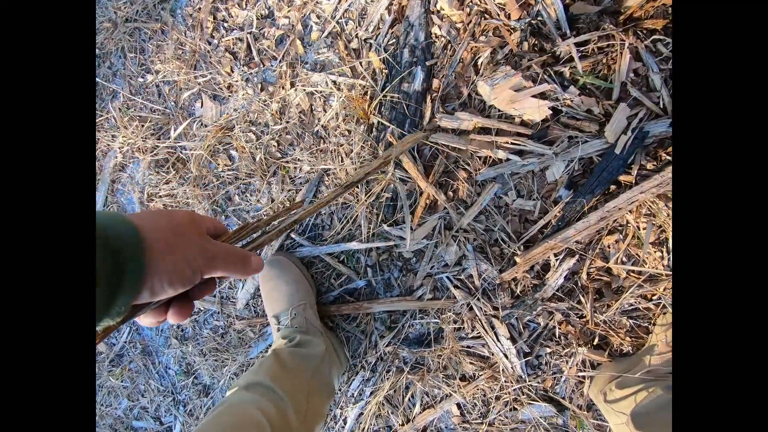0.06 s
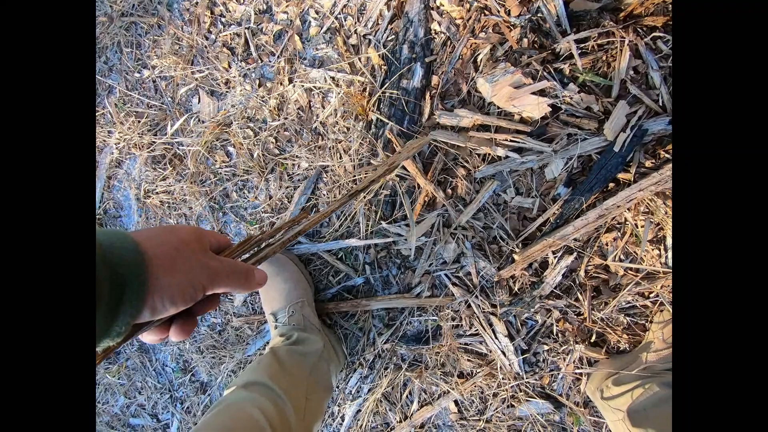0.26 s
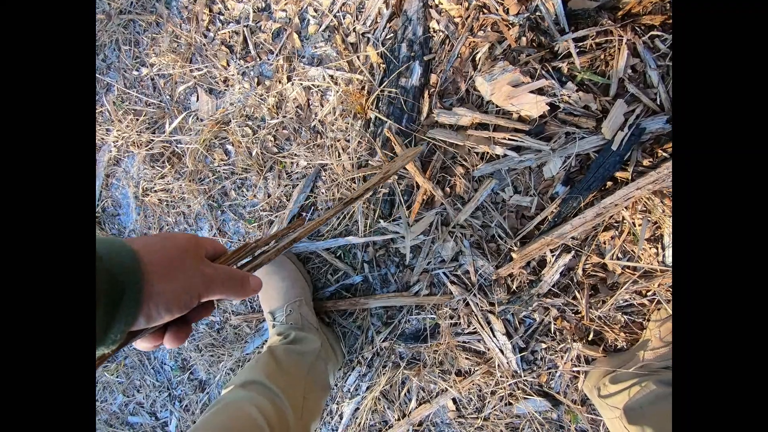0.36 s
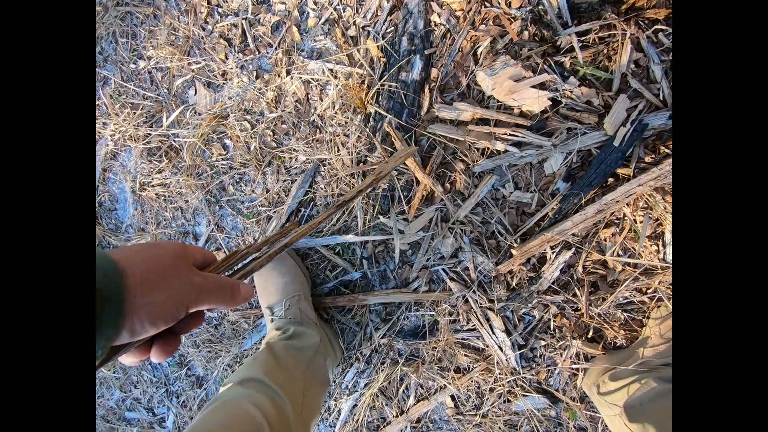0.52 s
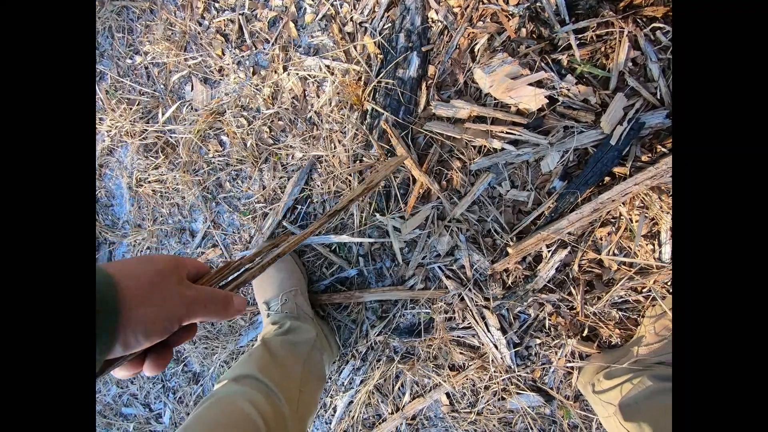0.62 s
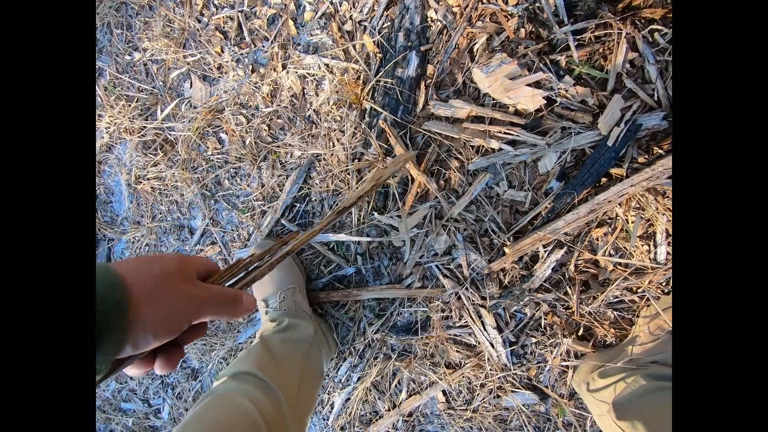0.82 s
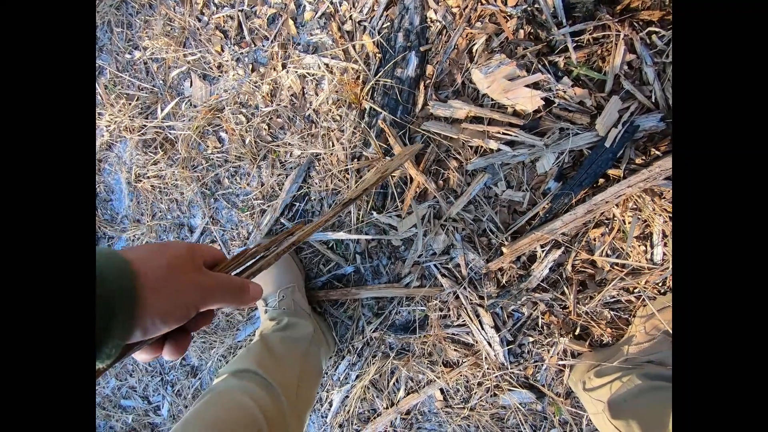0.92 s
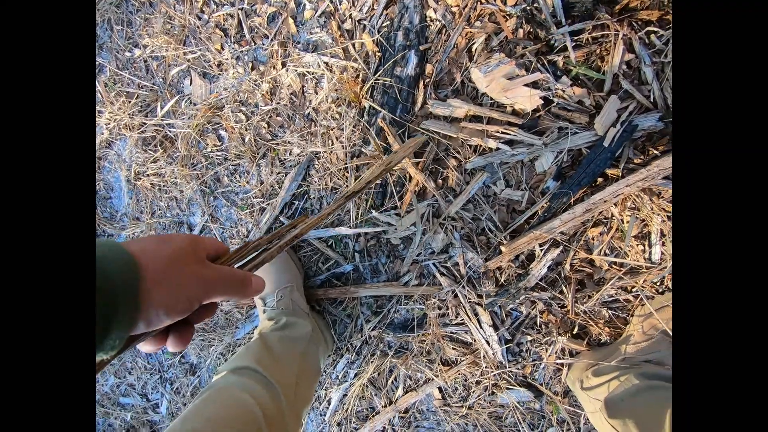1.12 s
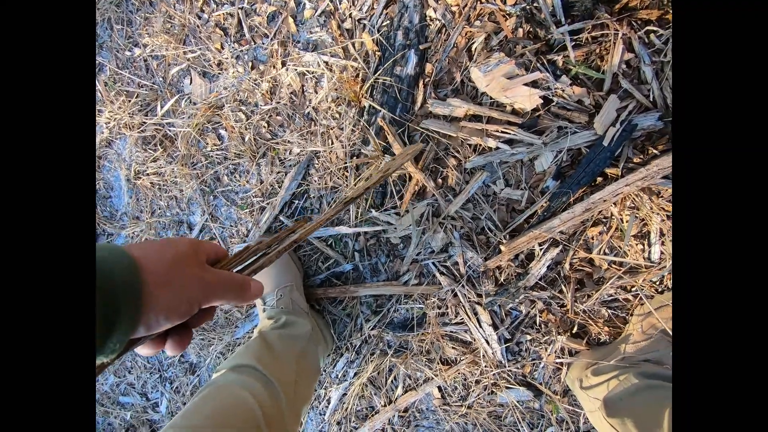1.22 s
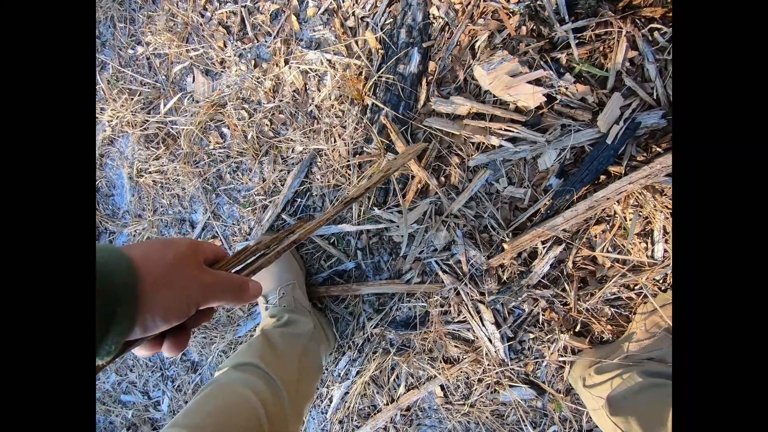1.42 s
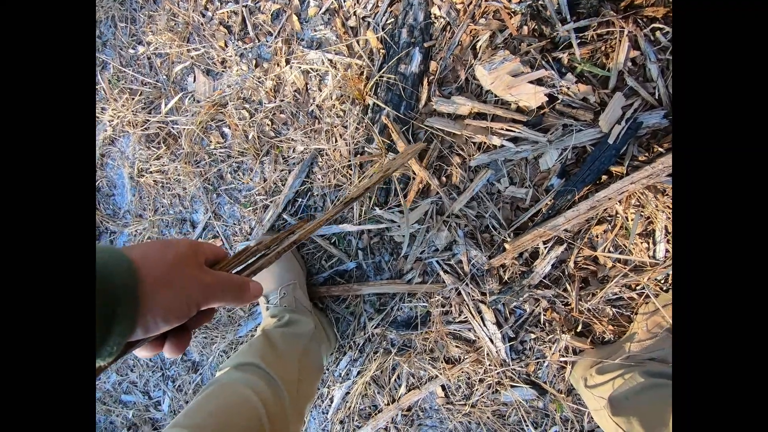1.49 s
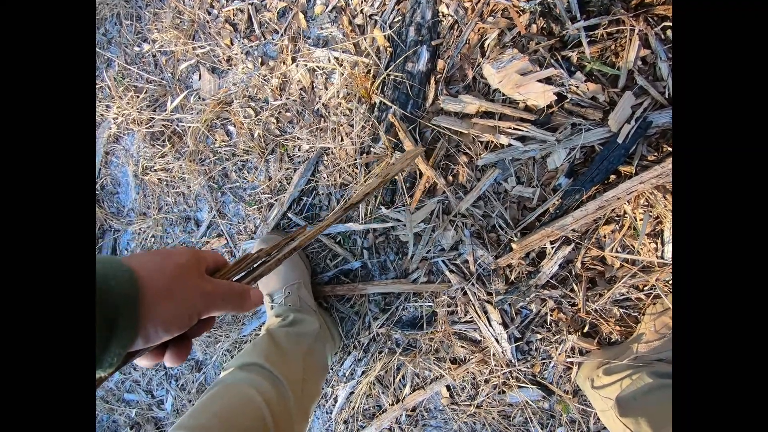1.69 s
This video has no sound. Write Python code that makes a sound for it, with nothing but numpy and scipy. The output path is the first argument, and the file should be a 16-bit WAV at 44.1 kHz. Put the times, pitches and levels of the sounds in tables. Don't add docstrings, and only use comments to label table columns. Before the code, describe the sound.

Dry wood breaking: rapid brittle snaps build to loud cracks, followed by scattered litter crunches and knocks

```python
import sys
import numpy as np
from scipy import signal
from scipy.fft import rfft, irfft
from scipy.io import wavfile

SR = 44100
rng = np.random.default_rng(int(sys.argv[2]) if len(sys.argv) > 2 else 0)


def generate_wav(signal):
    frames = np.transpose(np.atleast_2d(signal))
    scaled = np.clip(frames, -1, 1) * 32767
    pcm = np.round(scaled).astype(np.int16)
    wavfile.write(sys.argv[1], SR, pcm)


def to_linear_factor(level_db):
    exponent = np.asarray(level_db, float) / 20
    return 10 ** exponent


N = 77175

WOOD_LOW_HZ = 2030
PORT_HZ, PORT_WIDTH_HZ, PORT_DB, ROLL_HZ, AIR_DB = 9100, 415, 1, 9630, -12
SIDE_DB = -4.5
FIBRE_PAN_DB, POP_PAN_DB = 0, -1.8


def rms_one(x):
    return x / np.sqrt(np.mean(x ** 2) + 1e-20)


def line(rows, at, warp=np.asarray):
    xs, ys = np.array(rows)[:, 0], np.array(rows)[:, 1]
    return np.interp(warp(at), warp(xs), ys)


def cut(x, hz, kind, order=2):
    return signal.sosfilt(signal.butter(order, hz, kind, fs=SR, output="sos"), x)


def peak(x, hz, width_hz):
    r = np.exp(-np.pi * width_hz / SR)
    feed = np.array([1, 0, -1]) * (1 - r * r) / 2
    return signal.lfilter(feed, [1, -2 * r * np.cos(2 * np.pi * hz / SR), r * r], x)


def drift(rate_hz):
    r = np.exp(-2 * np.pi * rate_hz / SR)
    noise = rng.standard_normal(N + SR // 2)
    return rms_one(signal.lfilter([1], [1, -2 * r, r * r], noise)[SR // 2:])


def grains(shape):
    grains_per_s, spread_db = 5000, 3.0
    size = to_linear_factor(spread_db * np.minimum(rng.exponential(1, shape), 4))
    size = size * rng.choice([-1, 1], shape)
    return rms_one(size * (rng.random(shape) < grains_per_s / SR))


def chips(shape):
    kinds, ring_cycles, ring_db = 14, 5.8, -12.5
    clicks, dealt = grains(shape), rng.integers(0, kinds, shape)
    rung = 0
    for k, hz in enumerate(np.geomspace(1500, 10500, kinds)):
        struck = clicks * (dealt == k) + 1e-18
        rung = rung + rms_one(peak(struck, hz, hz / ring_cycles)) * np.sqrt(hz)
    return rms_one(clicks + to_linear_factor(ring_db) * rms_one(rung))


def ports(x, air_db=AIR_DB):
    x = x + to_linear_factor(PORT_DB) * peak(x, PORT_HZ, PORT_WIDTH_HZ)
    return cut(x, ROLL_HZ, "low", order=6) + to_linear_factor(air_db) * cut(x, ROLL_HZ, "high", order=4)


def add(out, sound, s, pan_db):
    i = int(s * SR)
    pair = sound[0] + to_linear_factor(SIDE_DB) * sound[1] * [[1], [-1]]
    pair = pair * to_linear_factor(np.array([[pan_db / 2], [-pan_db / 2]]))
    out[:, i:i + pair.shape[1]] += pair[:, :N - i]


def snaps(rows, pan_db, air_db):
    snap_q, burst_s, burst_db, hit_broad_db, port_db = 1.5, .0005, -11, -13, -11
    trail_s, trail_gain_db, trail_broad_db = .0032, 4, -1

    def fibre(x, hz, broad_db):
        rung = peak(peak(x, hz, hz / snap_q), hz, hz / snap_q)
        return ports(cut(rung + to_linear_factor(broad_db) * x, WOOD_LOW_HZ, "high"), air_db)

    out, t = np.zeros((2, N)), np.arange(SR // 16) / SR
    trail_shape = np.exp(-t / trail_s) * np.minimum(t / burst_s, 1)
    for (s, db, hz, trail_db), splinters in zip(rows, chips((len(rows), 2, len(t)))):
        hit = to_linear_factor(burst_db) * rng.standard_normal(splinters.shape) * np.exp(-t / burst_s)
        hit[0, 0] += 2
        hit += to_linear_factor(port_db) * 2 * peak(hit, PORT_HZ, 2 * PORT_WIDTH_HZ)
        hit = fibre(hit, hz, hit_broad_db)
        rough = splinters + rng.standard_normal(splinters.shape)
        trail = rms_one(fibre(rough, hz, trail_broad_db)) * trail_shape
        top = np.abs(hit[0]).argmax()
        snap = hit / np.abs(hit[0, top]) + to_linear_factor(trail_db + trail_gain_db) * trail
        add(out, to_linear_factor(db) * snap, s - top / SR, pan_db)
    return out


def thump():
    start_s, level_db, start_hz, end_hz, sag_s, t60_s = .4113, -30.5, 215, 46, .008, .27
    out, t = np.zeros((2, N)), np.arange(SR // 4) / SR
    turns = end_hz * t + (start_hz - end_hz) * sag_s * (1 - np.exp(-t / sag_s))
    swing = to_linear_factor(level_db - 60 * t / t60_s) * np.sin(2 * np.pi * turns)
    add(out, swing * np.array([[1], [0]]), start_s, FIBRE_PAN_DB)
    return out


def knocks():
    # t/s, peak level/dB, f/Hz, T60/s
    knock_rows = [(.005, -38.5, 310, 0.061), (0.044, -33.5, 305, 0.05), (0.051, -30.5, 143.4, 0.068),
                  (.14, -45.5, 304, 0.16), (.37, -52.5, 163, 0.29), (.4095, -29.5, 523, 0.012),
                  (0.424, -37.5, 242, 0.058), (.474, -39, 585, 0.0089), (0.486, -32, 230, 0.041),
                  (.489, -28, 720, 0.0061), (.559, -34, 304, 0.022), (.692, -34.5, 156, 0.082),
                  (.7, -37.5, 330, 0.042), (.854, -41.5, 276, 0.21), (0.855, -16, 835, 0.0065),
                  (1.236, -32.5, 277, 0.029), (1.329, -35.5, 246, 0.082), (1.328, -25, 402, 0.023),
                  (1.3275, -13.5, 830, 0.006), (1.42, -51, 263, 0.16), (1.466, -59, 317, 0.12)]
    rough_gain, body_pan_db, boot_pan_db = .35, -1.2, -5
    out, t = np.zeros((2, N)), np.arange(SR // 4) / SR
    noises = rng.standard_normal((len(knock_rows), 2, len(t)))
    for (s, db, hz, t60_s), noise in zip(knock_rows, noises):
        rough = rms_one(peak(peak(noise, hz, .6 * hz), hz, .6 * hz))
        mode = np.sin(2 * np.pi * hz * t) * [[1], [0]]
        shape = to_linear_factor(-60 * t / t60_s) * (1 - np.exp(-t * hz * 1.1))
        ring = (mode + rough_gain * rough) * shape
        add(out, to_linear_factor(db) * ring, s, body_pan_db if hz < 400 else boot_pan_db)
    return out


def slide():
    # t/s, length/s, level/dB, f/Hz
    slide_rows = [
        (.87, .19, -59, 1780),
        (1.334, .025, -49, 4200),
        (1.486, .03, -50, 4000),
        (1.672, .02, -56, 2600),
        (1.676, .019, -53, 4000),
    ]
    slide_q = 7
    out = np.zeros((2, N))
    for s, length_s, db, hz in slide_rows:
        t = np.arange(int(length_s * SR)) / SR
        hum = grains((2, len(t)))
        hum = rms_one(peak(peak(hum, hz, hz / slide_q), hz, hz / slide_q))
        add(out, to_linear_factor(db) * hum * np.sqrt(np.sin(np.pi * t / length_s)), s, POP_PAN_DB)
    return out


def crunches():
    starts_s = [.026, .09, .2, .411, .488, .612, .643, .685, .735, .856, 1.227, 1.254, 1.327, 1.395, 1.462,
                1.53, 1.618, 1.672]
    # length/s, level/dB, f/Hz
    crunch_rows = [(0.072, -46.5, 8200), (0.18, -53.5, 7800), (0.009, -43, 5800), (0.0049, -30.5, 10000),
                   (0.058, -48, 4700), (0.046, -48, 8000), (0.014, -39.5, 8700), (0.015, -51, 2100),
                   (0.064, -48.5, 3100), (0.015, -43, 2000), (0.02, -34.5, 4000), (0.038, -41.5, 2800),
                   (0.017, -33.5, 3300), (0.024, -58, 2700), (0.037, -45.5, 3300), (0.037, -50, 4300),
                   (0.041, -49.5, 2740), (0.019, -53.5, 1800)]
    crunch_q, broad_db, low_hz, fall_db, tail_s, pan_db = 5.4, -5.5, 440, 8.5, .011, -1.5
    out, t = np.zeros((2, N)), np.arange(SR // 6) / SR
    clumps_db = 2.5 * drift(45)
    bark = chips((len(crunch_rows), 2, len(t)))
    for s, (length_s, db, hz), g in zip(starts_s, crunch_rows, bark):
        body = peak(g, hz, hz / crunch_q) + to_linear_factor(broad_db) * g
        body = rms_one(cut(body, low_hz, "high", order=1))
        attack = np.clip(t / (.0014 + .043 * length_s), 0, 1)
        tail = np.exp(-np.maximum(t - length_s, 0) / tail_s)
        shape = attack * to_linear_factor(-fall_db * t / length_s) * tail
        clump_db = clumps_db[int(s * SR) // 2:][:len(t)]
        add(out, to_linear_factor(db + 3 + clump_db) * body * shape, s, pan_db)
    return out


def pops():
    # t/s, peak level/dB, f/Hz
    pop_rows = [(0.466, -37, 4800), (0.493, -39, 4570), (0.514, -36, 6700), (.632, -39, 4900),
                (.645, -54, 8600), (0.65, -42.5, 9100), (0.682, -36, 3270), (0.69, -35, 3530),
                (0.77, -42, 5200), (.780, -38, 3820), (.803, -32.5, 3330), (0.826, -40, 2440),
                (0.861, -37, 8100), (0.88, -58, 8000), (0.912, -34, 6660), (0.945, -51, 1700),
                (.9615, -39.5, 6400), (0.991, -43, 6650), (1.042, -43.5, 9200), (1.082, -54, 4540),
                (1.111, -48, 2940), (1.2296, -30, 2900), (1.232, -35, 5000), (1.2415, -28, 6300),
                (1.274, -37, 4500), (1.274, -32, 840), (1.337, -40, 4200), (1.354, -52, 4300),
                (1.4, -42, 6470), (1.467, -28.5, 9250), (1.474, -39, 7000), (1.4845, -33, 7100),
                (1.522, -37, 6540), (1.538, -41, 9000), (1.6227, -37, 4200), (1.633, -44, 7800),
                (1.4629, -26.5, 5560), (1.484, -29, 4030), (.8965, -30.5, 7240), (0.8054, -37.5, 2200),
                (1.239, -35.5, 2230), (1.3295, -21.5, 2040), (.479, -14.5, 4360), (0.4108, -15, 4040),
                (0.8546, -30.5, 1520), (0.3552, -43, 1680), (1.4995, -36, 7250), (1.588, -36.5, 4100)]
    pop_q, crack_s, broad_db = 6.5, .0011, -18
    out, t = np.zeros((2, N)), np.arange(SR // 50) / SR
    noises = rng.standard_normal((len(pop_rows), 2, len(t)))
    for (s, db, hz), noise in zip(pop_rows, noises):
        burst = noise * t / crack_s * np.exp(-t / crack_s)
        broad = to_linear_factor(broad_db) * cut(burst, WOOD_LOW_HZ, "high")
        pop = ports(peak(burst, hz, hz / pop_q) + broad)
        add(out, to_linear_factor(db) * pop / np.abs(pop[0]).max(), s - crack_s, POP_PAN_DB)
    return out


def litter():
    # f/Hz, band level/dB
    spectrum = [(71, -40), (120, -2.5), (301, 3.5), (418, -2), (1160, -4), (1790, -6.5), (9020, -5.5),
                (14400, -42), (16000, -40)]
    # t/s, level/dB
    weight = [(0, -52), (.22, -53), (.28, -53), (.45, -48.5), (.54, -58.5), (.6, -52), (.75, -47),
              (.95, -51), (1.1, -58.5), (1.21, -61.5), (1.3, -55.5), (1.5, -47), (1.75, -58)]
    level_db, patchy_db, alike = -0.5, 2, .47
    out, edges_hz, together = 0, 120 * 2 ** np.arange(0, 7.3, .5), drift(18.6)
    white = chips((2, 2, N)) + .25 * rng.standard_normal((2, 2, N))
    for k, (low, high) in enumerate(zip(edges_hz, edges_hz[1:])):
        mid, side = cut(white[k % 2], [low, high], "band")
        band_db = line(spectrum, np.sqrt(low * high), np.log)
        gain = to_linear_factor(band_db + patchy_db * (1.56 * together + drift(24)))
        pair = np.sqrt(1 + alike) * mid + np.sqrt(1 - alike) * side * [[1], [-1]]
        out = out + gain * pair
    level = to_linear_factor(level_db + line(weight, np.arange(N) / SR))
    return level * rms_one(cut(out, 120, "high", order=4))


def stick_ring(bark):
    modes_hz = (1800., 2600., 4200.)
    width_hz, level_db = 110, -3
    return to_linear_factor(level_db) * sum(peak(bark, hz, width_hz) for hz in modes_hz)


def puffs():
    # t/s, level/dB
    puff_level = [(0, -50), (.1, -46.5), (.15, -52.5), (.22, -62), (.26, -88), (.4, -75), (.43, -40),
                  (.47, -51), (.5, -47.5), (.52, -67), (.65, -78), (.83, -67), (.87, -93), (1.0, -79),
                  (1.2, -47), (1.28, -49.5), (1.33, -67), (1.75, -101)]
    top_hz, bottom_hz, side_db, lumps_db = 65, 13.0, -5, 2
    low = cut(rng.standard_normal((2, N + SR)), top_hz, "low", order=3)
    mid, side = rms_one(cut(low, bottom_hz, "high")[:, SR:])
    level = to_linear_factor(line(puff_level, np.arange(N) / SR) + lumps_db * drift(6.4))
    return level * (mid + to_linear_factor(side_db) * side * [[1], [-1]])


def scene():
    # t/s, peak level/dB, f/Hz, splinter trail level/dB
    fibres = [(.1568, -28, 8400, -17), (.1622, -38, 2500, -14), (.1685, -34, 8200, -16),
              (.1808, -29, 8600, -13), (.188, -34, 7800, -18), (.1995, -25, 7800, -13),
              (.2059, -20, 8000, -14), (.2083, -18, 8700, -18), (.2854, -35, 6500, -12),
              (.289, -30, 6500, -22), (.2983, -19, 6000, -20), (.311, -27, 5000, -18),
              (.3265, -25, 5700, -14), (.3551, -15, 6000, -18), (.3578, -15, 7500, -19),
              (.3582, -23, 2600, -15), (.3985, -26, 6500, -14), (.4034, -8.5, 5400, -19),
              (.4103, -1.5, 4500, -24), (.4192, -22, 5500, -16), (.4763, -29, 6300, -14),
              (.4789, -11, 6300, -18), (.4797, -13, 4600, -18), (.4802, -15, 2600, -19),
              (.4917, -28, 7000, -10), (.5516, -30, 8000, -12), (.5598, -4.5, 5300, -30),
              (.5625, -24, 5500, -18), (.5601, -11, 9000, -28)]
    twigs = [(.6136, -38, 9000, -10), (.8981, -31, 7500, -12), (.9166, -28, 7500, -17),
             (1.026, -40, 3200, -16), (1.238, -17, 4600, -20), (1.2563, -29, 4200, -13),
             (1.266, -29, 6800, -11), (1.3273, -19, 6500, -18), (1.3286, -15, 4600, -16),
             (1.33, -19, 2300, -14), (1.3323, -21, 9000, -19), (1.5005, -31, 9200, -18),
             (1.5501, -23, 6200, -18), (1.5672, -36, 3000, -16), (1.5876, -37, 7300, -13),
             (1.6518, -28, 6000, -24), (1.7271, -35, 6500, -14)]
    ticks = [
        (.7065, -36, 9000, -12),
        (.7366, -38, 2800, -8),
        (.7576, -35, 4400, -10),
        (.8058, -15, 8800, -26),
        (.81, -18, 8200, -22),
        (.8549, -17, 2350, -17),
        (1.4158, -40, 3800, -10),
        (1.4492, -38, 3800, -11),
        (1.4637, -18, 3400, -20),
        (1.4851, -24, 4000, -19),
    ]
    wood = snaps(fibres, FIBRE_PAN_DB, air_db=-9.5)
    wood = wood + snaps(twigs, pan_db=1, air_db=-19)
    wood = wood + snaps(ticks, pan_db=-4, air_db=-11.5)
    bark = ports(crunches()) + litter()
    stick = stick_ring(bark) + knocks() + thump() + slide()
    return wood + stick + bark + pops() + puffs()


def low_pass(x):
    return signal.sosfilt(signal.butter(12, 16660, fs=SR, output="sos"), x)


def record(dry):
    # f/Hz, width/Hz, share removed [0-1]
    shade = [(690, 1500, 0.29), (2350, 1700, 0.34)]
    left_lag_s, clip_level, top_hz = .000022, .93, 16600
    lag_s = np.array([[left_lag_s], [0]])
    late = np.exp(-2j * np.pi * np.fft.rfftfreq(N, 1 / SR) * lag_s)
    x = irfft(rfft(dry) * late, N)
    for hz, width_hz, share in shade:
        x[0] -= share * peak(x[0], hz, width_hz)
    x = np.clip(x, -clip_level, clip_level)
    x = signal.sosfilt(signal.cheby2(12, 70, top_hz, fs=SR, output="sos"), x)
    return low_pass(x)


dry = scene()
out = record(dry)
generate_wav(out)
```